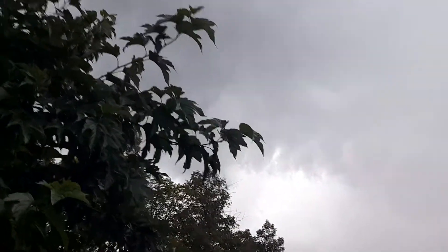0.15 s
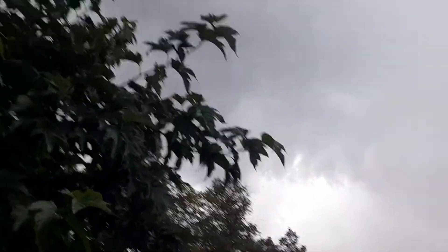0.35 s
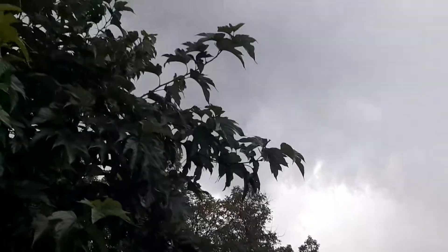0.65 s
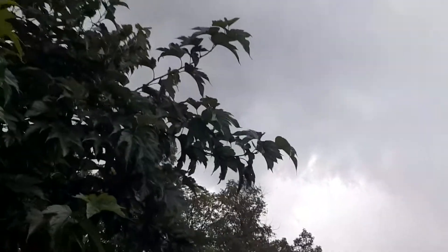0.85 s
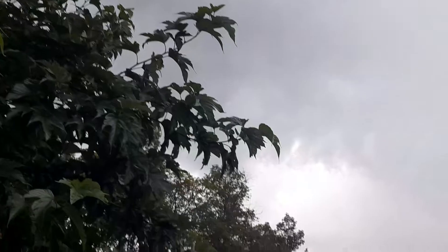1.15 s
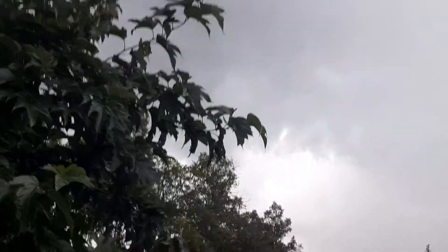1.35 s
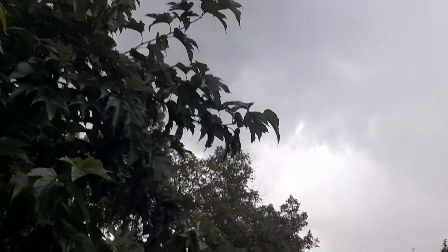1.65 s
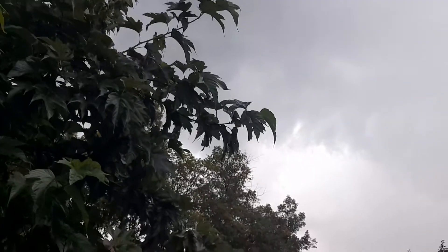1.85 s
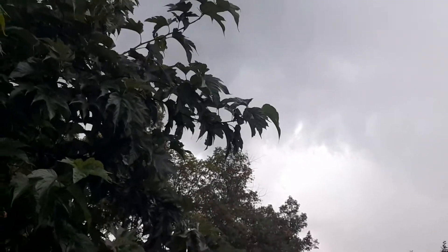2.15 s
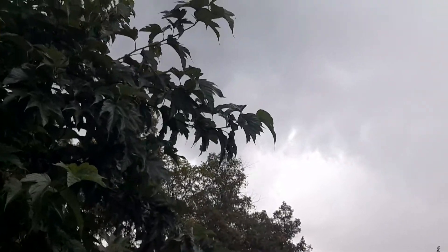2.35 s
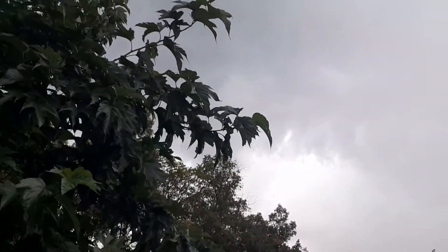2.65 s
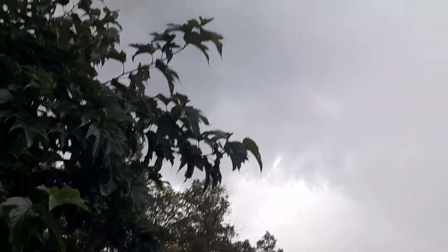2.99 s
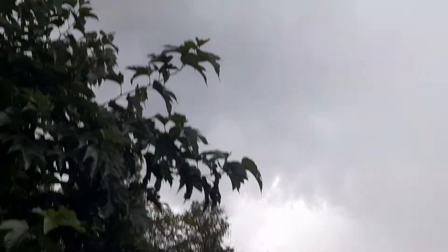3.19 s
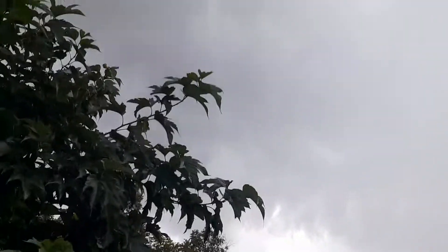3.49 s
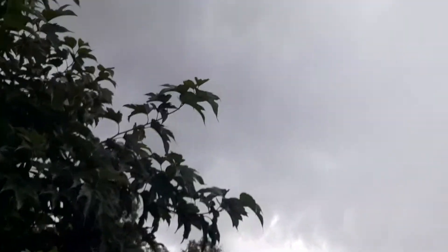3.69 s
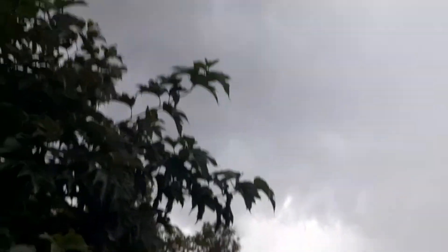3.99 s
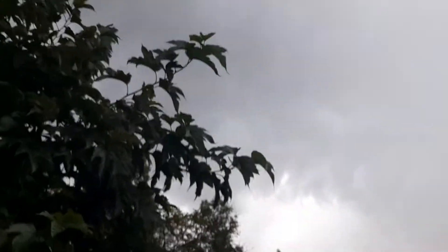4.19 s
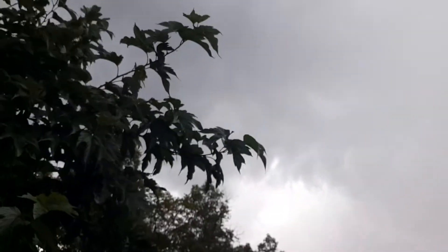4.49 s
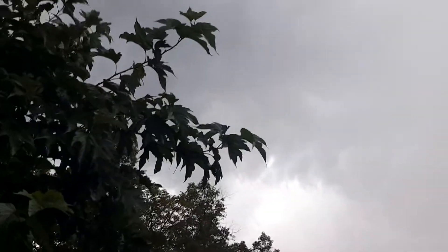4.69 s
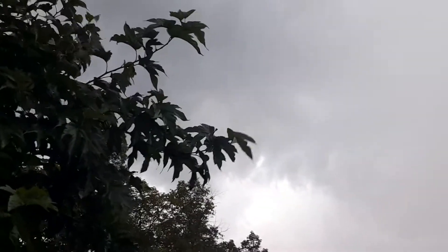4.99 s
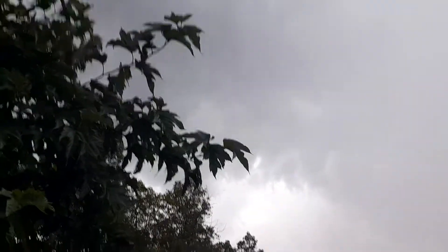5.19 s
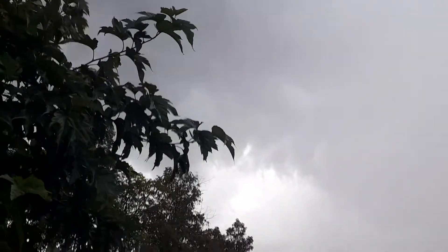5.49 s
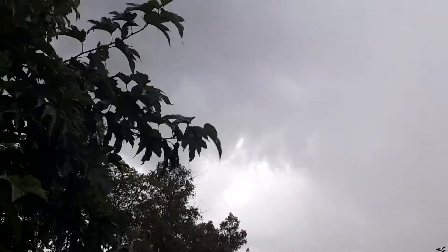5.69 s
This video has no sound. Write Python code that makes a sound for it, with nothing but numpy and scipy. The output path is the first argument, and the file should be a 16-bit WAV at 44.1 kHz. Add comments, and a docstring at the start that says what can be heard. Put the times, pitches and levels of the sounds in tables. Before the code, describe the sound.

Low far-off thunder grumbles, peaks early with a few duller cracks, then dies away above soft patchy rain and tiny leaf drips.

```python
"""Far thunder rolls in over a garden in overlapping peals and dies away; light rain hisses and ticks on leaves.
Thunder is shaped random shocks and noise, with low booms and sharp shocks; rain is patchy noise and noise clicks.
A phone holds two microphones: the left is open, the right is covered, so it hears dull, with its lows late.
At the end a gust thumps the open port, and wind filtering thins its bass for moments."""
import sys
import numpy as np
from scipy import signal
from scipy.fft import rfft, irfft, next_fast_len
from scipy.io import wavfile
from scipy.ndimage import uniform_filter1d, map_coordinates

SR = 44100
rng = np.random.default_rng(int(sys.argv[2]) if len(sys.argv) > 2 else 0)


def waveform_to_disk(signal):
    """Save audio, clipped to [-1, 1], as 16-bit WAV at the path in sys.argv[1]."""
    frames = np.transpose(np.atleast_2d(signal))
    scaled = np.clip(frames, -1, 1) * 32767
    samples = np.round(scaled).astype(np.int16)
    wavfile.write(sys.argv[1], SR, samples)


N = 257544
TIME = np.arange(N) / SR  # s
DROP_T60 = 0.0035  # s, time in which a drop's click decays by 60 dB

# spectrum of water striking near leaves: (frequency [Hz], relative density [dB])
LEAF_SPECTRUM = [(4000, -9), (5500, -1.5), (8040, -8), (10000, -4.5), (12500, -3.5), (14500, -8.5),
                 (15800, -9)]


def amp(db):
    """Decibels to amplitude ratio: 20 dB is a factor of ten."""
    return 10 ** (np.asarray(db) / 20)


def unit(x):
    """Normalisation to an rms of 1."""
    return x / np.sqrt(np.mean(x ** 2) + 1e-20)


def curves(rows):
    """Linear interpolation: one value per sample for each column after the time."""
    s, *columns = np.transpose(rows)
    return [np.interp(TIME, s, column) for column in columns]


def wobble(rate):
    """Spline interpolation of random values: a smooth curve with rate knots a second."""
    knots = rng.standard_normal(int(N * rate / SR) + 4)
    return map_coordinates(knots, [TIME * rate])


def filtered(x, response):
    """Linear filtering: the spectrum of x times a complex response of frequency."""
    m = next_fast_len(N + SR // 2)
    return irfft(rfft(x, m) * response(np.fft.rfftfreq(m, 1 / SR)), m)[..., :N]


def coloured(x, points):
    """Spectral shaping by (Hz, dB) points on a log frequency axis, weaker outside them, rms 1."""
    f, db = np.transpose(points)

    def response(hz):
        return amp(np.interp(np.log(hz + 1), np.log(f), db, db[0] - 19, db[-1] - 28))

    return unit(filtered(x, response))


def shocks(per_s, spread_db):
    """Impulsive radiation: the kinks of the lightning channel give random shocks, a few much larger."""
    chance, sign, height = rng.random((3, N))
    struck = chance < per_s / SR
    return unit(struck * np.sign(sign - 0.5) * amp(-spread_db * np.log(height + 1e-9)))


def evened(x, span_s, share):
    """Level evening: divides x by part of its running envelope over span_s, for a steadier rumble."""
    power = np.abs(signal.fftconvolve(x ** 2, np.hanning(round(span_s * SR)), "same"))
    return unit(x / (power / power.mean() + 0.15) ** (np.clip(share, 0, 1) / 2))


def roll():
    """Filtered shocks and noise: distance and echoes blur the roll, and its bright parts follow a curve."""
    # course of the roll: (time [s], level [dB], brightness relative to the level [dB], deep rumble [dB])
    roll_rows = [(0.0, -56.5, -23.5, -52), (0.21, -64, -9, -58), (0.37, -54.5, -22.5, -61),
                 (0.53, -46.5, -8, -55), (0.71, -51.5, -6, -67), (1.24, -51, -8.5, -55),
                 (1.46, -42.5, -11, -42), (1.5, -38, -16.5, -53), (1.53, -44.5, -5, -45),
                 (1.66, -41.5, -11.5, -48), (1.69, -45, -9, -57), (1.85, -36.5, -14.5, -56),
                 (1.93, -41.5, -13, -55), (2.68, -47.5, -15, -52), (2.78, -42, -24, -56),
                 (2.85, -48.5, -15.5, -55), (3.03, -50, -18, -48), (3.25, -43.5, -18.5, -45),
                 (3.72, -48.5, -16.5, -55), (3.92, -49, -15.5, -47), (4.0, -41.5, -22.5, -54),
                 (4.05, -49.5, -14, -56), (4.49, -52.5, -20, -51), (4.59, -54.5, -20.5, -63),
                 (5.41, -59, -22, -52.5), (5.84, -60, -26, -55.5)]
    # surges in which the deep rumble heaves: (centre [s], rms before the lulls [dB])
    surge_rows = [(.07, -55), (.39, -46.5), (.57, -46.5), (.79, -56), (1.0, -46.5), (1.2, -49.5),
                  (1.45, -44), (1.67, -47), (1.86, -47), (2.01, -44), (2.15, -46), (2.45, -48), (2.71, -52),
                  (3.21, -52), (3.44, -46), (3.57, -48), (3.7, -49), (3.98, -46.5), (4.17, -45),
                  (4.35, -50), (4.58, -49.5), (4.81, -46.5), (4.98, -46.5), (5.13, -51), (5.28, -57),
                  (5.53, -50)]
    # claps, where the bright parts jump up and sink back: (start [s], nominal jump [dB], sink time [s])
    clap_rows = [(.505, 10, 0.058), (.775, 7.5, 0.032), (1.386, 7.5, 0.059), (1.455, 6, 0.037),
                 (1.515, 2.5, 0.058), (1.8, 3, 0.044), (1.875, 4, 0.034), (2.01, 5, 0.058),
                 (2.33, 5.5, .05), (2.45, 6.5, 0.071), (3.36, 4, 0.022), (3.97, 1, 0.027), (4.06, 4, 0.045),
                 (4.85, 6, .03)]
    # lulls, where the low roll dips briefly: (centre [s], dip [dB])
    lull_rows = [(.28, 7), (.745, 2), (1.12, 5), (1.26, 4), (1.38, 4), (1.95, 7), (2.265, 9), (2.55, 8),
                 (3.08, 6.5), (3.45, 6.5), (3.625, 5), (3.76, 2.5), (4.06, 3), (4.22, 3.5), (4.72, 10),
                 (4.885, 5), (5.06, 2), (5.19, 9), (5.37, 6), (5.64, 3)]
    # spectra of the four layers, lowest first: (frequency [Hz], relative density [dB])
    deep_spectrum = [(12, -40), (22, -9), (36, -11), (45, -2), (55, 2), (64, 3), (80, -7), (100, -4.5),
                     (130, -28)]
    body_spectrum = [(44, -19), (75, -14.5), (119, 0.5), (172, 0), (190, -0.5), (227, -8.5), (260, -9),
                     (340, -20.5), (570, -120)]
    edge_spectrum = [(130, -30), (215, -7), (237, -8.5), (285, -1.5), (356, -3.5), (400, -10), (520, -12),
                     (880, -120)]
    crackle_spectrum = [(210, -34), (360, -18.5), (434, -5.5), (524, -14), (594, -6.5), (664, -11.5),
                        (1900, -43), (2470, -76), (4180, -120)]
    surge_s, lull_s, clap_rise_s = 0.039, 0.016, 0.0066  # s, two Gaussian widths and a ramp
    body_db, edge_db, crackle_db = 1, -2.5, 3.35  # dB, layers relative to the level
    edge_tilt, edge_jumps, edge_dips = 0.33, 0.33, 0.47  # share of brightness, claps and lulls in the edge

    steps = shocks(per_s=900, spread_db=2)
    level_db, bright_db, deep_db = curves(roll_rows)
    surge_power = sum(amp(2 * db) * np.exp(-((TIME - s) / surge_s) ** 2) for s, db in surge_rows)
    clap_db = sum(db * np.clip((TIME - s) / clap_rise_s, 0, 1) * np.exp(-np.abs(TIME - s) / sink_s)
                  for s, db, sink_s in clap_rows)
    lull_db = sum(db * np.exp(-((TIME - s) / lull_s) ** 2 / 2) for s, db in lull_rows)
    knots_db = 1.3 * wobble(14)

    deep_gain = np.sqrt(amp(2 * deep_db) + surge_power) * amp(-lull_db)
    body_gain = amp(level_db + body_db - lull_db + knots_db)
    edge_gain = amp(level_db + edge_db + edge_tilt * bright_db
                    + edge_jumps * clap_db - edge_dips * lull_db + 1.26 * knots_db)
    crackle_gain = amp(level_db + crackle_db + bright_db + clap_db + 0.98 * knots_db)

    def layer(gain, spectrum, span_s, share):
        source = steps + 1.02 * rng.standard_normal(N)
        return gain * evened(coloured(source, spectrum), span_s, share)

    return (layer(deep_gain, deep_spectrum, span_s=0.079, share=0.55)
            + layer(body_gain, body_spectrum, span_s=0.11, share=0.8)
            + layer(edge_gain, edge_spectrum, span_s=0.077, share=0.39)
            + layer(crackle_gain, crackle_spectrum, span_s=0.027, share=0.13))


def booms():
    """Amplitude modulation: each boom is a low sine under a swell that rises faster than it falls."""
    # single booms that stand out of the roll: (centre [s], peak [dB], pitch [Hz], nominal half length [s])
    boom_rows = [(0.462, -45.5, 107, 0.034), (0.517, -34.5, 160, 0.02), (0.521, -39.5, 288, 0.012),
                 (0.549, -40, 175.4, 0.046), (0.6, -36.5, 168, 0.0068), (0.647, -45, 301, 0.011),
                 (0.786, -45, 270, 0.026), (0.857, -42, 144, 0.016), (1.404, -39, 170, 0.023),
                 (1.469, -31, 83, 0.0059), (1.493, -41, 284, 0.013), (1.494, -24.5, 169, 0.0094),
                 (1.547, -37.5, 276, 0.022), (1.566, -37, 118, 0.015), (1.649, -36, 119, 0.013),
                 (1.819, -30, 191, 0.021), (1.862, -35, 283, 0.018), (1.886, -34.5, 181, 0.02),
                 (1.898, -34, 303, 0.011), (1.935, -41, 144, 0.03), (1.975, -36, 143, 0.0089),
                 (2.029, -34.5, 287, 0.017), (2.033, -33, 107, 0.029), (2.353, -35.5, 139, 0.026),
                 (2.449, -39.5, 104.3, 0.03), (2.462, -40, 278, 0.016), (2.516, -38, 128, 0.015),
                 (2.654, -35, 169, 0.0088), (2.775, -35, 147.8, 0.019), (3.238, -38, 127, 0.02),
                 (3.293, -36.5, 172.4, 0.019), (3.378, -39.5, 325, 0.02), (3.392, -37, 194, 0.031),
                 (3.474, -40.5, 115, 0.018), (3.577, -39.5, 145, 0.0077), (3.687, -38.5, 164, 0.018),
                 (3.819, -42, 241, 0.017), (3.863, -42, 151, 0.02), (3.99, -37.5, 150.4, 0.026),
                 (4.104, -39, 179, 0.0068), (4.131, -41, 228, 0.012), (4.319, -42.5, 54.2, 0.049),
                 (4.4, -39.5, 56, 0.03), (4.802, -50.5, 107, 0.034), (4.851, -41.5, 155, 0.0066),
                 (4.994, -46.5, 94, 0.02),]
    out = np.zeros(N)
    for s, db, hz, half_s in boom_rows:
        near = slice(round((s - 0.08) * SR), round((s + 0.12) * SR))
        t = TIME[near] - s
        width_s = half_s * np.where(t < 0, 0.7, 1.1)
        swell = np.exp(-(t / width_s) ** 2 / 2)
        out[near] += amp(db) * swell * np.sin(2 * np.pi * hz * t + rng.uniform(0, 2 * np.pi))
    return out


def pushes(rows):
    """Bipolar pressure pulse, a Gaussian's derivative: a push, then a pull, peaking at the row's level."""
    out = np.zeros(N)
    for s, db, width_s in rows:
        u = (TIME - s) / width_s
        out -= amp(db) * u * np.exp((1 - u ** 2) / 2)
    return out


def sharp_shocks():
    """Bipolar pressure pulses: compression and rarefaction follow each other within milliseconds."""
    # single sharp shocks, and a small late blip: (centre [s], peak [dB], width [s])
    shock_rows = [(.514, -31, 0.0012), (.781, -31, 0.00073), (1.401, -32.5, 0.00061), (1.494, -42, 0.0009),
                  (1.891, -30.5, 0.0005), (2.72, -28, 0.0014), (3.986, -33.5, 0.002),
                  (5.71, -42.5, 0.00086)]
    return pushes(shock_rows)


def ticks(rows, t60):
    """Impact sound: each drop is a decaying click of noise in a band around its own pitch."""
    t = np.arange(256) / SR
    hz = np.fft.rfftfreq(len(t), 1 / SR)
    s, db, centre_hz = np.transpose(rows)[:, :, None]
    band = np.exp(-(np.log((hz + 1) / centre_hz) / 0.74) ** 2)
    noise = irfft(rfft(rng.standard_normal((len(s), len(t)))) * band)
    click = noise * amp(-60 * t / t60) * (1 - np.exp(-t / 0.0004))
    click /= np.abs(click).max(axis=1, keepdims=True)
    at = np.round(s * SR).astype(int) + np.arange(len(t))
    return np.bincount(at.ravel(), (amp(db) * click).ravel(), N + SR)[:N]


def near_drops():
    """Impact sound: drops click on the nearest leaves."""
    # near drops: (time [s], peak [dB], pitch centre [Hz])
    drop_rows = [(.053, -38, 10600), (.1887, -49, 10000), (.346, -44, 9600), (.3858, -39, 9400),
                 (.8229, -40.5, 11800), (.898, -42, 10900), (.9636, -40, 10400), (1.0537, -41, 13000),
                 (1.1984, -46, 10000), (1.3559, -42, 11600), (1.4086, -43, 9400), (1.4993, -41, 8700),
                 (1.7236, -42, 11200), (1.8393, -42, 10400), (1.9533, -42, 10800), (1.9734, -41, 9800),
                 (2.0507, -40, 10600), (2.0966, -45, 9900), (2.1665, -40, 10600), (2.1976, -42, 8900),
                 (2.3505, -43, 12100), (2.4086, -45, 11600), (2.4623, -45, 11200), (2.6241, -42, 10000),
                 (2.6755, -38, 10300), (2.6951, -45, 10300), (2.7688, -41, 11900), (2.7727, -45, 8100),
                 (2.7908, -42, 9400), (2.7953, -38.5, 13300), (3.0283, -43, 11200), (3.1082, -45, 10900),
                 (3.1232, -44, 9500), (3.1945, -46, 11100), (3.6224, -46, 12300), (3.7341, -37, 9700),
                 (3.8102, -46, 11300), (3.8403, -40.5, 8900), (4.0834, -45, 9900), (4.2137, -42, 9300),
                 (4.2781, -38, 9800), (4.435, -40.5, 11400), (4.7525, -41, 9400), (4.7927, -45, 9500),
                 (5.0676, -45, 9800), (5.1212, -44, 11200), (5.2662, -47, 10200), (5.4945, -43, 11700),
                 (5.5188, -43.5, 9100), (5.7892, -46, 9800)]
    return ticks(drop_rows, DROP_T60)


def sprays():
    """Amplitude-modulated noise: each spray swells fast and thins out slowly."""
    # soft bursts of spray in the leaves: (centre [s], rms at the centre [dB], nominal half length [s])
    spray_rows = [(0.3, -64, .008), (0.393, -60, .008), (0.484, -59.5, 0.016), (0.637, -61, 0.014),
                  (.795, -61, 0.01), (.88, -64, .008), (.974, -61, .009), (1.47, -60.5, 0.011),
                  (1.6, -63, 0.017), (1.86, -64, 0.02), (2.348, -64, .01), (2.622, -61, 0.0067),
                  (2.68, -64, 0.011), (2.783, -64, 0.029), (3.092, -64, .02), (3.263, -62, 0.0051),
                  (3.352, -59, .0075), (3.452, -63, 0.0097), (3.664, -58.5, 0.0041), (4.086, -59, .004),
                  (4.116, -57.5, .01), (4.26, -64, 0.046), (4.83, -67, .02), (5.048, -61, 0.011),
                  (5.518, -62, 0.013)]
    swell = np.zeros(N)
    for s, db, half_s in spray_rows:
        width_s = half_s * np.where(TIME < s, 0.35, 1.9)
        swell += amp(db) * np.exp(-((TIME - s) / width_s) ** 2 / 2)
    return swell * coloured(rng.standard_normal(N), LEAF_SPECTRUM)


def patchy(points, patchy_db, tall, long):
    """Non-stationary noise: the level drifts in patches, tall bins of pitch by long frames of time."""
    z = signal.stft(rng.standard_normal(N), nperseg=256)[2]
    field = uniform_filter1d(rng.standard_normal(z.shape), round(tall), 0)
    field = uniform_filter1d(field, round(long), 1)
    noise = signal.istft(z * amp(patchy_db * unit(field)), nperseg=256)[1][:N]
    return coloured(noise, points)


def rain():
    """Incoherent summation: countless impacts merge into far hiss and near fizz, under small single drops."""
    # course of the rain: (time [s], strength before the hiss offset [dB])
    rain_rows = [(0, -70.5), (.36, -69.5), (.58, -66.5), (.85, -71), (2.05, -66.5), (2.9, -69.5),
                 (3.12, -71.5), (3.22, -67.5), (3.5, -66.5), (3.8, -69), (4.0, -67.5), (4.3, -69.5),
                 (5.0, -68.5), (5.84, -71.5)]
    # spectrum of rain on far foliage: (frequency [Hz], relative density [dB])
    foliage_spectrum = [(350, -41), (620, -20), (729, -0.5), (1080, 2.5), (1310, -2), (1640, -5),
                        (2000, -7.5), (2330, -0.5), (2650, 1), (3510, 0.5), (4600, 3), (5400, -0.5),
                        (6300, -9), (8000, -18), (10400, -40)]
    hiss_db, fizz_db, fizz_follows = 5.5, -63.5, 0.13  # dB over the strength; dB; share of its changes

    strength_db, = curves(rain_rows)
    hiss = amp(strength_db + hiss_db) * patchy(foliage_spectrum, patchy_db=1.78, tall=10, long=9)
    fizz_gain = amp(fizz_db + fizz_follows * (strength_db - strength_db.mean()))
    fizz = fizz_gain * patchy(LEAF_SPECTRUM, patchy_db=1.5, tall=40, long=5)

    when, height, pitch = rng.random((1500, 3)).T
    small = np.transpose([when * N / SR, -61 - 3.23 * np.log(height), 6000 * 2.2 ** pitch])
    return hiss + fizz + ticks(small, DROP_T60)


def gust():
    """Wind pressure on a port: each thump is one slow push and pull."""
    # gust thumps on the open port: (centre [s], peak [dB], width [s])
    thump_rows = [(5.464, -54, 0.0042), (5.509, -41.5, 0.001), (5.55, -35.5, 0.0034), (5.833, -43, 0.0044)]
    return pushes(thump_rows)


def stirring_air():
    """Turbulent pressure noise: air stirring at a port is a steady low rumble."""
    # spectrum of the stirring: (frequency [Hz], relative density [dB])
    stir_spectrum = [(20, -1.5), (45, -9), (80, -12), (130, -5), (250, -45.5)]
    return amp(-61.5) * coloured(rng.standard_normal(N), stir_spectrum)


def covered(x):
    """First-order low-pass of a leaky seal: it dulls the treble, and its phase lag delays the lows."""
    def response(hz):
        advance = np.exp(2j * np.pi * hz * 8e-5)  # 80 microseconds, offsets part of the lag
        return advance / (1 + 1j * hz / 80)

    return amp(6.5) * filtered(x, response)


def scene():
    """Partial coherence: both ports share most of the thunder, but hear rain from other directions."""
    thunder, thumps = roll() + booms() + sharp_shocks(), gust()
    left = thunder + rain() + near_drops() + sprays() + thumps + stirring_air()
    # a second, independent roll reaches only the covered port
    right = covered(0.77 * thunder + 0.3 * roll() + rain() + 0.58 * thumps + stirring_air())
    return np.array([left, right])


def record(dry):
    """Recording chain: wind filtering thins the left bass for moments; self-noise, bass cut, weaker top treble."""
    # the left bass thins: (start [s], end [s], share of amplitude lost)
    dropout_rows = [(5.337, 5.46, 0.54), (5.587, 5.812, 0.98)]
    # self-noise of the covered microphone: (frequency [Hz], relative density [dB])
    self_noise_spectrum = [(600, -106), (2000, -110), (5000, -113), (8000, -119), (11000, -112),
                           (14300, -105), (15700, -112)]
    fade_s, top_treble_hz, top_treble_db, limit_hz = 0.0089, 14600, -8, 15770

    gone = sum(np.clip(lost, 0, 1) * np.clip(np.minimum(TIME - start, end - TIME) / fade_s, 0, 1)
               for start, end, lost in dropout_rows)
    bass = filtered(dry[0], lambda hz: 1 / (1 + (hz / 300) ** 12))
    self_noise = amp(-83) * coloured(rng.standard_normal(N), self_noise_spectrum)
    both = np.array([dry[0] - gone * bass, dry[1] + self_noise])

    def response(hz):
        bass_cut = (1j * hz / (33 + 1j * hz)) ** 2
        top_treble = amp(top_treble_db * (hz > top_treble_hz))
        return bass_cut * top_treble * (hz < limit_hz)

    return filtered(both, response)


dry = scene()
out = record(dry)
waveform_to_disk(out)
```